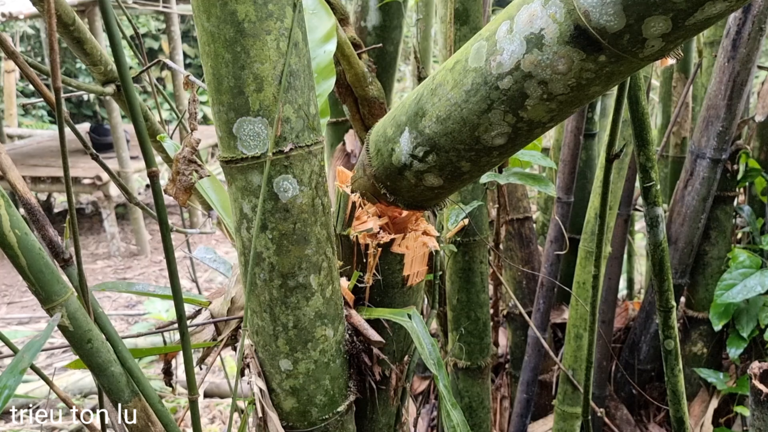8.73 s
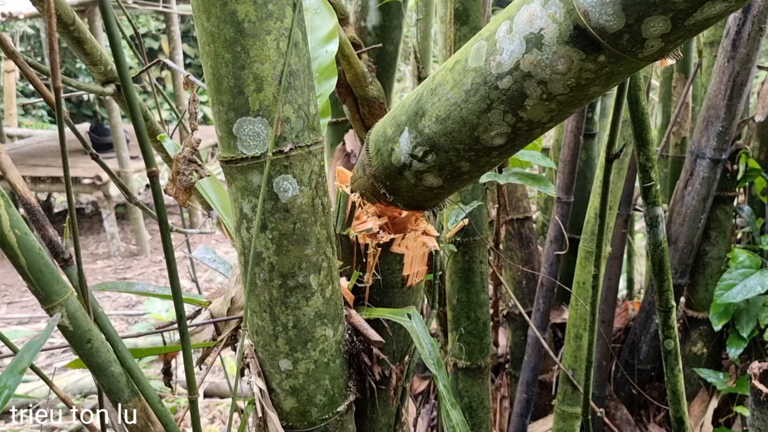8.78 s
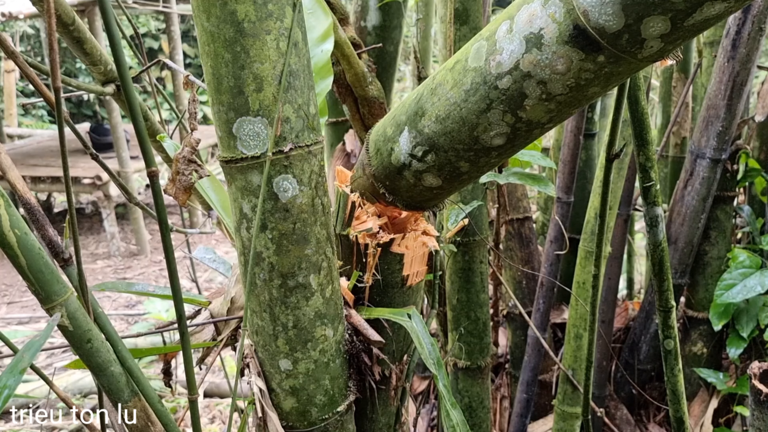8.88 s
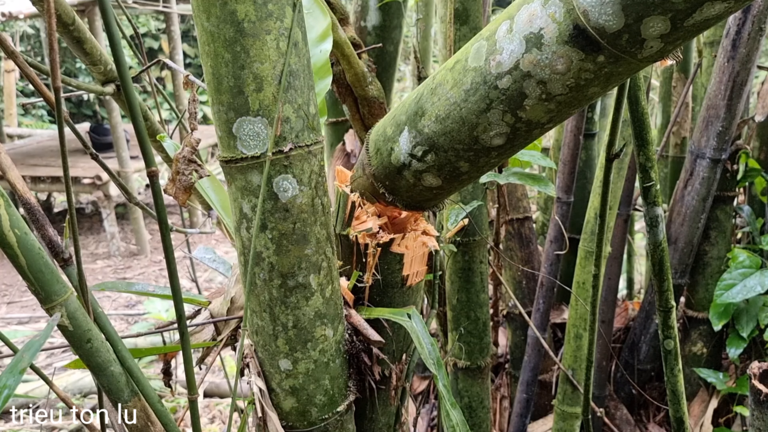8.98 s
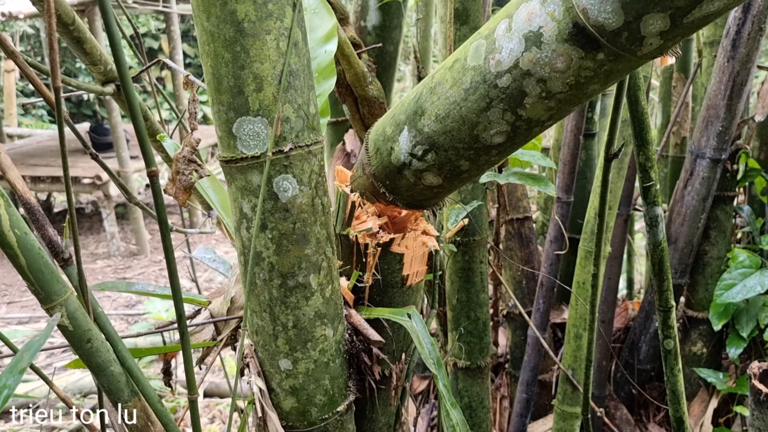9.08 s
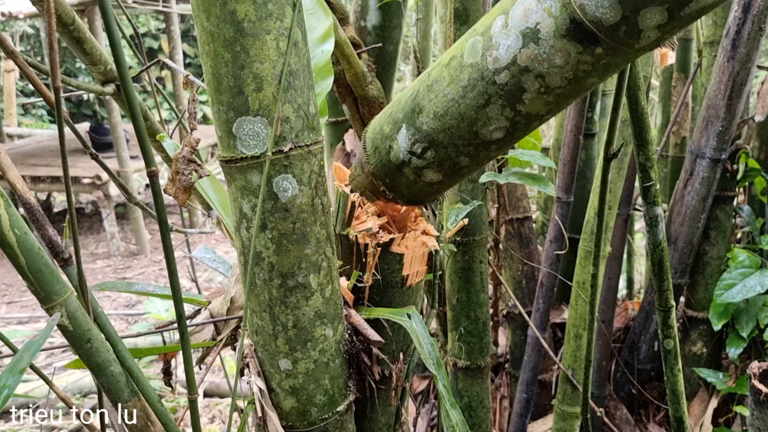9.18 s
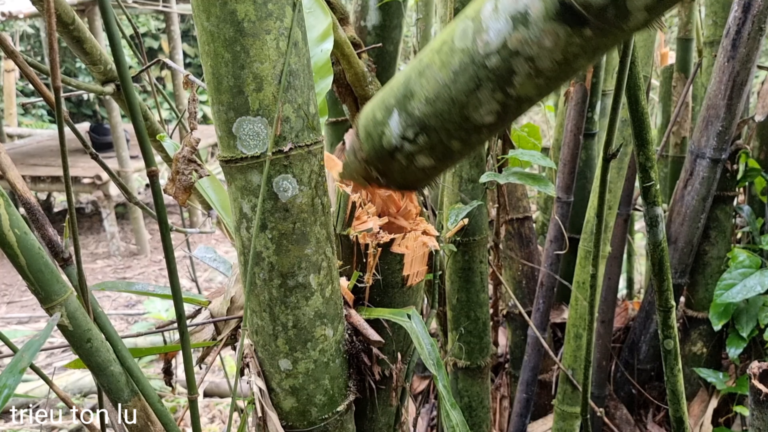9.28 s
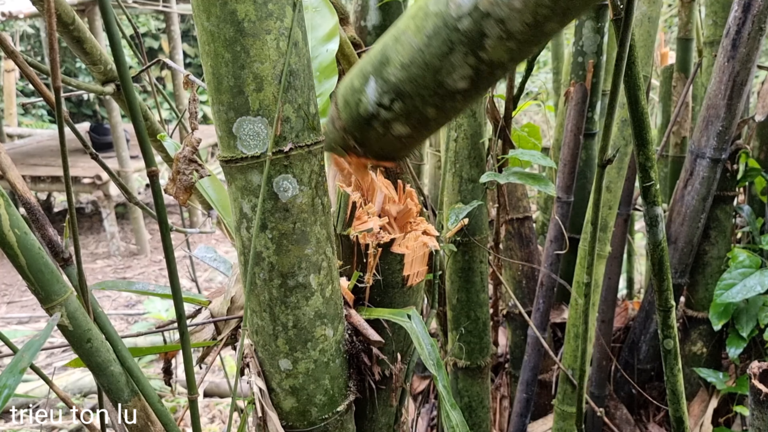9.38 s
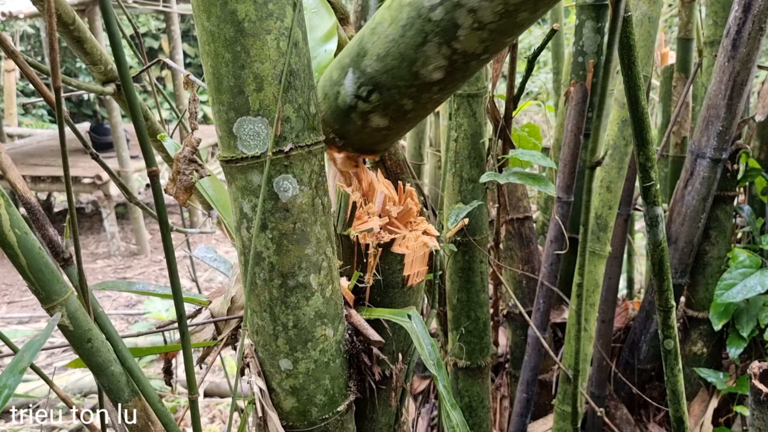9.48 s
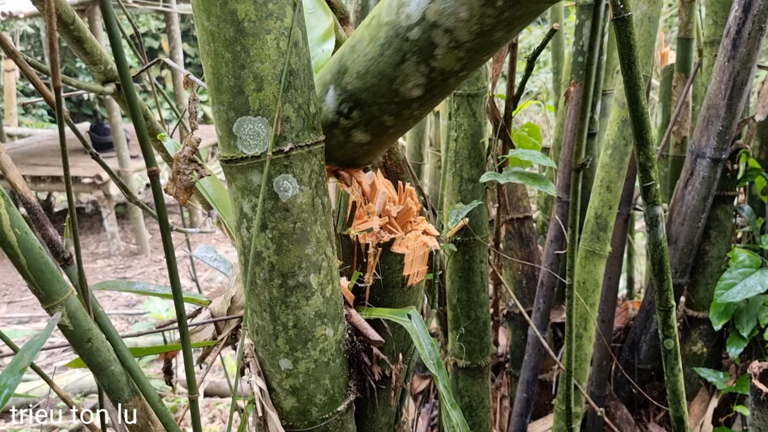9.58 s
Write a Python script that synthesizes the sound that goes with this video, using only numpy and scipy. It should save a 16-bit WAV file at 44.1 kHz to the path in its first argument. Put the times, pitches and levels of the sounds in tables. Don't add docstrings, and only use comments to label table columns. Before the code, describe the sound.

In a quiet bamboo grove, a blade bites a thick hollow stem in sharp, woody, resonant blows that thud in the soil and echo among the stems. Small chips and twigs tick down. A near bird gives a fast rising trill, then the hardest chops fall. Finally stems and dry leaves scrape, bump and snap as they are dragged away. Close stereo microphones, faint insects and distant whistles.

```python
import sys
import numpy as np
from scipy import signal
from scipy.fft import rfft, irfft, next_fast_len
from scipy.io import wavfile
from scipy.ndimage import uniform_filter1d, map_coordinates

SR = 44100
rng = np.random.default_rng(int(sys.argv[2]) if len(sys.argv) > 2 else 0)


def undo_db(level):
    steps = np.asarray(level, float) / 20
    return 10 ** steps


def master(y):
    cut = np.clip(np.atleast_2d(y).T, -1, 1)
    pcm = np.round(cut * 32767)
    wavfile.write(sys.argv[1], SR, pcm.astype(np.int16))


N = 424683

# (frequency [Hz], level [dB])
AIR_COLOUR = [(15, -24.5), (25, -2.5), (49, -10), (152, -18.5), (340, -7), (826, -5.5), (1270, -4),
              (1620, -8), (3530, -8.5), (7910, -17.5), (11500, -28), (14300, -24.5), (15500, -24)]
# (time [s], level [dB])
AIR_LEVEL = [(0, -75.5), (1.9, -73.5), (3.6, -73.5), (5.599, -73), (6.501, -76), (6.8, -65.5), (7.5, -68),
             (8.699, -73), (9.63, -73.5)]
# (frequency [Hz], left-right likeness [-1..1])
AIR_LIKENESS = [(60, .9), (240, .4), (950, -.2), (3770, .2), (15000, .1)]
# (time [s], length [s], pitch [Hz], level [dB])
CRICKETS = [(0.022, 0.18, 6040, -78), (0.9, 0.094, 6160, -70), (1.345, 0.042, 6300, -81),
            (3.723, 0.13, 6180, -69), (5.712, 0.25, 6220, -74.5), (5.799, 0.34, 6620, -75.5)]
# (time [s], length [s], start pitch [Hz], end pitch [Hz], level [dB])
FAR_WHISTLES = [(3.3, .33, 4080, 4150, -80), (5.5, .1, 2950, 3300, -71), (6.185, .33, 4470, 4440, -70),
                (6.52, .19, 4700, 4670, -72), (4.68, .1, 6750, 6720, -79), (6.198, .025, 5650, 5640, -73),
                (6.31, .2, 5680, 5650, -86), (.885, .06, 3200, 3350, -79), (1.33, .11, 2750, 2950, -77),
                (5.745, .06, 3100, 3400, -81)]
# (time [s], length [s], start pitch [Hz], end pitch [Hz], level [dB])
LEAD_IN = [
    (1.915, 0.04, 7500, 6100, -56.5),
    (2.11, 0.081, 7290, 7910, -54),
    (2.352, 0.0495, 8470, 8360, -55),
]
# (time [s], peak level [dB])
TRILL = [(2.49, -45.5), (2.6248, -44.5), (2.7538, -42.5), (2.882, -43.5), (3.0167, -44), (3.147, -45),
         (3.287, -46)]
# (frequency [Hz], T60 [s])
NEAR_ECHO = [(100, 0.5), (500, 0.2), (2500, 0.17), (12000, 0.018)]
# (frequency [Hz], T60 [s])
FAR_ECHO = [(100, 0.07), (600, 0.83), (2700, 0.65), (12000, 0.31)]
# (frequency [Hz], level [dB])
FAR_COLOUR = [(300, -3.5), (1200, -7), (4000, -3), (12000, 3)]
# (frequency [Hz], left-right likeness [-1..1])
ECHO_LIKENESS = [(100, 1), (220, 0.58), (380, 0.48), (700, 0.068), (5000, 0.043)]
# (frequency [Hz], left-right likeness [-1..1])
DIRECT_LIKENESS = [(100, 1), (400, 0.56), (1500, 0.46), (6000, 0.73), (14000, 0.018)]
# (time [s], level [dB])
HEAVY_BLOWS = [
    (.226, -34.5),
    (.952, -41.5),
    (4.222, -34.5),
    (4.909, -62.5),
]
# (frequency [Hz], level [dB])
CLUMP_COLOUR = [(250, -31), (480, -5), (640, 3), (850, -4.5), (1900, -18.5), (2650, -2), (3400, -19.5),
                (12000, -27)]
# (time [s], peak level [dB])
THUDS = [(0.229, -28.5), (0.948, -25), (1.491, -47), (1.645, -40.5), (1.7, -65), (2.869, -60), (2.925, -77),
         (4.2, -63.5), (4.22, -37.5), (4.333, -50), (4.917, -45), (6.614, -76), (8.211, -58.5),
         (8.52, -57.5)]
# (frequency [Hz], level [dB])
SOIL_COLOUR = [(18, -36), (30, -8), (80, 0.5), (108, -6), (200, -6.5), (260, -30.5), (440, -120)]
# (frequency [Hz], left-right likeness [-1..1])
GROUND_LIKENESS = [(30, .96), (80, .99), (250, .9)]
# (time [s], level [dB])
FOOTFALLS = [(6.63, -63), (6.901, -69), (7.08, -57), (7.33, -53.5), (7.49, -56.5), (7.68, -65.5),
             (8.19, -63), (8.511, -71), (9.35, -58.5), (9.47, -70)]
# (frequency [Hz], level [dB])
STEP_COLOUR = [(15, -37), (25, 6), (65, 3.5), (156, -14), (190, -9), (250, -27), (420, -120)]
# (time [s], scrape level [dB], tube over scrape [dB])
CREEP = [(6.501, -85, -10), (6.779, -78.5, -12), (6.88, -60.5, -9), (7.1, -63.5, 4), (7.195, -71, -2),
         (7.3, -58, 1), (7.39, -72, 2), (7.62, -60, 1.5), (7.85, -65.5, -5), (8.0, -75.5, 7),
         (8.091, -59, -4.5), (8.2, -70, 1.5), (8.4, -63.5, -9), (8.622, -71.5, -2), (8.8, -68, 1),
         (8.95, -70.5, -2.5), (9.15, -80, 3.5), (9.5, -64.5, -6)]
# (peak time [s], scrape level [dB], swell by 20 dB [s], tube over scrape [dB], leaves over scrape [dB])
TUGS = [(5.36, -59.5, -0.01, -0.5, -4.5), (6.629, -53, -0.15, -1, -9.5), (6.9, -50.5, 0.04, -19, -22),
        (6.97, -48, 0.02, -20, -11.5), (7.039, -40.5, 0, -29, -12), (7.13, -55, 0.02, -13, -24),
        (7.268, -35.5, -0.03, -4.5, -9), (7.306, -38.5, -0.0329, -2, -25), (7.02, -37.5, -0.0339, -22, -8),
        (7.28, -40, 0.0458, -12, -17), (7.229, -48, 0.03, -17, -11), (7.34, -55, 0.09, -13, -9),
        (7.461, -43.5, 0.0342, -7, -20), (7.514, -43, 0.0157, -11, -14), (9.42, -44.5, 0.0137, -8, -16),
        (9.45, -42, -0.0341, -8, -15), (9.324, -39, -0.0344, -15, -12), (7.489, -38, 0.0165, -3, -11),
        (7.09, -50.5, 0.0845, -9, -15), (7.16, -55.5, 0.19, -8.5, -13), (7.746, -43, 0.0137, 1.5, -13.5),
        (8.19, -67.5, 1.17, 1.5, -2), (8.45, -63, -1.4, -10.5, -7.5), (8.513, -43, -0.09, -19, 12),
        (9.25, -40, -0.0238, -3, -16.5), (9.288, -38.5, -0.1534, -6, -10), (9.35, -32, -0.0143, -13, -4),
        (9.388, -44.5, 0.0958, 1.5, -10), (9.468, -68, 0.15, -1, -26), (9.625, -41, -0.1947, -9.5, -15)]
# (frequency [Hz], level [dB])
SCRAPE_COLOUR = [(290, -32), (500, -16), (681, -11), (786, 0), (1310, -5), (1430, -6), (1920, -1),
                 (7000, -16), (9100, -48), (15400, -120)]
# (frequency [Hz], width [Hz], level [dB])
GROANS = [(1230, 240, -1), (1870, 660, -8.5), (2750, 800, -2), (3700, 1100, -6)]
# (frequency [Hz], level [dB])
LEAF_COLOUR = [(2350, -27.5), (4000, -7), (6290, 0), (11800, -4), (14300, 2.5), (15400, -4), (16000, -13)]
# (time [s], peak level [dB], wall ring [Hz], tube level [dB])
BUMPS = [(6.969, -37, 1280, -7), (7.045, -21, 1210, -9.5), (7.317, -21.5, 1120, -9.5),
         (7.453, -32.5, 1600, -10), (7.471, -27.5, 1780, -11), (7.553, -50, 1920, 10.5),
         (7.617, -44.5, 1090, -8), (7.704, -40, 1130, -5), (7.967, -43.5, 1150, -7.5),
         (8.284, -58, 790, 15.5), (9.287, -34.5, 1810, -5), (9.334, -24, 2330, -7),
         (9.462, -27.5, 1060, -4), (9.525, -39.5, 1100, -2), (9.545, -42, 2660, -20), (9.587, -44, 813, 2),
         (9.599, -38, 929, -17)]
# (time [s], peak level [dB], wall ring [Hz], crack level [dB])
SNAPS = [(6.794, -49, 2750, -0.5), (6.895, -33, 1240, -33), (6.994, -34, 2680, -25), (7.015, -39, 3700, -7),
         (7.125, -31, 1130, -36), (7.22, -32, 2220, -24), (7.257, -27, 1310, -11), (7.293, -26, 1560, -41),
         (7.432, -41.5, 1890, -30), (7.735, -30.5, 2440, -11.5), (7.787, -36.5, 2520, -20),
         (7.892, -63.5, 867, 25.5), (7.934, -50.5, 1210, -3), (8.313, -39, 2400, -19),
         (8.464, -37, 1800, -10), (8.512, -22.5, 1980, -5.5), (8.56, -33.5, 3460, -2.5),
         (8.602, -45.5, 3145, 1), (8.92, -57.5, 1177, 12.5), (9.029, -48, 1522, -8.5),
         (9.241, -34.5, 841, -12), (9.318, -37, 1750, -16), (9.365, -28, 1680, 1),
         (7.064, -32.5, 2470, -27), (7.236, -36, 2200, -9), (7.273, -26.5, 1500, -17),
         (7.358, -47.5, 3000, 1.5), (7.486, -26.5, 2060, -10), (7.494, -24.5, 1770, -14),
         (7.634, -40, 2700, -6), (7.759, -38.5, 3000, -7), (7.8, -48, 5500, 5.5), (8.249, -58, 5000, 0),
         (8.332, -41.5, 2830, -12), (9.054, -59, 1080, 8), (9.203, -48.5, 3080, -16),
         (9.253, -35.5, 3390, -11), (9.351, -33, 1500, 2), (9.612, -38.5, 2570, -1)]
# (frequency [Hz], width [Hz], level [dB])
WALL_BODY = [(740, 140, 2), (1900, 1600, -1), (4430, 3300, -6.5)]
# (frequency [Hz], width [Hz], level [dB])
WALL_RINGS = [(970, 330, 1.5), (1500, 280, 0.5), (1850, 87, 1.5), (2430, 230, -1), (3270, 290, -7)]
# (frequency [Hz], width [Hz], level [dB])
TUBE = [(311, 100, -3), (474, 110, 3), (548, 290, -0.5)]
# (time [s], peak level [dB], wall ring [Hz], crack level [dB])
CHIPS = [(0.71, -52, 2955, -0.5), (0.768, -53, 2650, -35.5), (1.711, -37, 3700, -20), (1.753, -47, 1870, 1),
         (2.869, -33.5, 831, -23.5), (2.924, -34, 1001, -7), (2.961, -43, 3230, -16.5),
         (5.269, -53, 920, -11), (5.31, -45.5, 2524, -15.5), (5.412, -45.5, 3010, -30),
         (1.724, -38, 4800, -20), (3.785, -49.5, 3400, -19), (4.637, -46.5, 2990, -6.5),
         (4.669, -47.5, 4020, -17), (4.736, -51.5, 4500, -9), (6.198, -54, 1230, -17.5)]
# (time [s], peak level [dB], wall ring [Hz], crack level
# [dB])
TWIGS = [(1.516, -17.5, 4100, -35), (1.85, -39.5, 1940, 4.5), (1.983, -38, 2390, -8),
         (2.079, -60, 3050, 7.5), (2.25, -36.5, 3260, 11.5), (2.406, -35.5, 2300, -21),
         (2.449, -45.5, 3530, -27), (2.486, -35.5, 2870, -38.5), (2.635, -32.5, 3270, -36),
         (2.726, -50.5, 3260, -6), (2.788, -48.5, 2880, 2), (3.318, -51, 1400, -11),
         (3.499, -51, 3290, -11.5), (3.634, -50, 1230, -22), (3.748, -48.5, 3530, -8),
         (4.766, -38.5, 927, -27.5)]
# (time [s], peak level [dB], pitch [Hz], T60 [s])
HOLLOW_TONES = [(0.229, -26.5, 431, 0.23), (0.232, -27, 244, 0.25), (0.953, -18, 436.5, 0.096),
                (0.954, -21, 309, 0.093), (1.493, -29, 514, 0.083), (1.648, -37, 130.6, 0.13),
                (1.515, -33.5, 327, 0.086), (1.642, -36.5, 535, 0.14), (3.867, -42, 482, 0.12),
                (4.01, -37.5, 449, 0.087), (4.945, -26.5, 519, 0.1), (5.345, -56, 349, .2),
                (2.93, -56, 250.3, 0.22), (4.221, -29, 318, 0.075), (4.34, -21, 307.7, 0.098),
                (4.908, -32, 320, 0.1), (5.845, -43.5, 326, 0.16), (7.047, -37.5, 362, 0.13),
                (7.316, -41.5, 399, 0.087), (7.553, -33.5, 372, 0.061), (9.289, -30, 340, 0.045),
                (9.366, -32, 362, 0.067), (9.462, -35, 398, 0.085), (.229, -27, 548, 0.088),
                (.954, -22, 515, .09)]
# (time [s], peak level [dB], pitch [Hz], T60 [s])
WOODY_TONES = [(0.228, -13, 1064, 0.068), (.2275, -8, 1537, 0.035), (.228, -13.5, 955, 0.077),
               (.228, -16, 2610, 0.069), (.228, -16, 2075, .09), (0.953, -18, 1790, 0.056),
               (.952, -17, 2190, 0.043), (.953, -19, 1064, 0.095), (.953, -23, 935, 0.14),
               (.952, -19.5, 1420, 0.067), (1.644, -21, 780, 0.05), (4.224, -9, 1403, 0.073),
               (4.232, -15.5, 2440, 0.068), (4.222, -17.5, 3180, .12), (4.342, -12, 2870, 0.024),
               (4.922, -17, 2890, 0.048), (4.922, -16, 3350, 0.043), (2.405, -40.5, 1978, 0.036),
               (1.484, -25, 1297, 0.05), (1.643, -24, 1070, 0.072), (2.485, -35, 2870, 0.03),
               (2.636, -52, 3270, 0.03), (3.868, -32.5, 2430, 0.03), (4.0085, -12.5, 2720, 0.025),
               (4.0085, -16, 3180, .026), (4.009, -27.5, 1140, 0.048), (3.867, -30, 3600, 0.052),
               (3.867, -31.5, 970, 0.057), (4.199, -20, 1880, 0.031), (4.221, -7, 966, 0.056),
               (4.234, -10, 1780, 0.032), (4.342, -7.5, 1167, 0.034), (4.91, -15, 986, 0.057),
               (4.922, -12.5, 1656, 0.057), (5.845, -27.5, 1340, 0.049), (7.046, -29, 1276, 0.035),
               (7.125, -28.5, 1120, 0.036)]
# (time [s], peak level [dB], wall ring [Hz], tube level [dB], contact [s])
KNOCKS = [(1.481, -21.5, 1830, -15.5, 0.095), (1.516, -18, 2540, -19, 0.036),
          (1.626, -34.5, 923, -9, 0.056), (3.867, -24, 2430, -23, 0.022), (4.008, -21, 2900, -24, 0.016),
          (4.199, -16, 1770, -30.5, 0.05), (4.234, -7.5, 1805, -19, 0.037),
          (4.922, -10, 1614, -18.5, 0.029), (5.845, -24.5, 1360, -16.5, 0.029)]
# (time [s], peak level [dB], wall ring [Hz], tube level [dB], contact [s])
CUTS = [
    (0.2278, -7.5, 1300, -14.5, 0.039),
    (0.9522, -12, 2150, -5.5, 0.043),
    (1.613, -44, 2870, -28, 0.038),
    (1.643, -23.5, 1065, -10.5, 0.085),
    (4.001, -31, 2820, -22, 0.074),
    (4.221, -7, 1150, -25, 0.067),
    (4.341, -3, 1260, -18, 0.024),
    (4.894, -28, 1830, -19, 0.051),
    (4.909, -13, 969, -19, 0.057),
]


def unit(x):
    return x / np.sqrt(np.mean(x ** 2) + 1e-20)


def along(points, hz):
    f, v = np.transpose(points)
    return np.interp(np.log(hz + 1), np.log(f + 1), v)


def wobble(rate):
    return map_coordinates(rng.standard_normal(int(N * rate / SR) + 4), [np.arange(N) * rate / SR])


def filtered(x, response):
    n = x.shape[-1]
    m = next_fast_len(n + 8192)
    return irfft(rfft(x, m) * response(np.fft.rfftfreq(m, 1 / SR)), m)[..., :n]


def modes(table):
    def response(f):
        total = 0
        for k, (centre, width, db) in enumerate(table):
            damping = 1j * f * width
            total = total + (-1) ** k * undo_db(db) * damping / (centre * centre - f * f + damping)
        return total
    return response


def pair(ab, colour, alike):
    def response(hz):
        turn = np.arccos(np.clip(along(alike, hz), -1, 1)) / 2
        return undo_db(along(colour, hz)) * [np.cos(turn), np.sin(turn)]
    both = filtered(ab, response)
    mid, side = both[..., 0, :], both[..., 1, :]
    return np.stack([mid + side, mid - side], axis=-2)


def grit(rate, spread_db):
    happens, size = rng.random((2, N))
    return (happens < rate / SR) * undo_db(-spread_db * np.log(size + 0.003)) * rng.choice([-1, 1], N)


def tails(t60, colour, count):
    noise = rng.standard_normal((count, 2, SR * 3 // 4))
    hz, t, z = signal.stft(noise, SR, nperseg=256)
    lumps = uniform_filter1d(rng.standard_normal(z[:, :1].shape), 3, -2)
    lumps = unit(uniform_filter1d(lumps, 9, -1))
    decay_db = 1.5 * lumps - 60 * t / along(t60, hz)[:, None]
    tail = pair(signal.istft(z * undo_db(decay_db), SR, nperseg=256)[1], colour, ECHO_LIKENESS)
    return tail / np.linalg.norm(tail[0, 0])


def grove(x, kick, near_db, far_db, pan_db):
    near = undo_db(near_db) * tails(NEAR_ECHO, [(1000, 0)], count=5)
    far = undo_db(far_db) * tails(FAR_ECHO, FAR_COLOUR, count=5)
    slot = np.arange(N) * 4 // SR % 5
    wet = 0
    for k, echo in enumerate(near + far):
        late = np.pad(kick * (slot == k), (110, 0))
        wet = wet + signal.fftconvolve(late[None], echo, axes=1)[:, :N]
    return (x + wet) * undo_db([[pan_db / 2], [-pan_db / 2]])


def air():
    z = signal.stft(rng.standard_normal((2, N)), nperseg=512)[2]
    patches = uniform_filter1d(rng.standard_normal(z.shape[1:]), 6, 0)
    patches = unit(uniform_filter1d(patches, 14, 1))
    noise = signal.istft(z * undo_db(1.8 * patches), nperseg=512)[1][:, :N]
    wash = pair(noise, AIR_COLOUR, AIR_LIKENESS)
    s, db = np.transpose(AIR_LEVEL)
    return undo_db(np.interp(np.arange(N) / SR, s, db) + 6.0) * unit(wash)


def crickets():
    out = np.zeros((2, N))
    for s, length, hz, db in CRICKETS:
        start, n = round(s * SR), round(length * SR)
        ring = modes([(hz, 170, 0)])
        hiss = unit(filtered(rng.standard_normal((2, n)), lambda f: ring(f) ** 2))
        pulsing = 1 + .5 * np.sin(2 * np.pi * 30 * np.arange(n) / SR)
        out[:, start:start + n] += undo_db(db) * hiss * np.hanning(n) ** 0.099 * pulsing
    return out


def note(length, start_hz, end_hz, glide):
    t = np.arange(round(length * SR)) / SR
    hz = end_hz + (start_hz - end_hz) * np.exp(-t / glide)
    swell = np.sin(np.pi * t / length) ** .5
    return swell * np.sin(2 * np.pi * np.cumsum(hz) / SR)


def birds():
    trill, held, scattered = np.zeros((3, N + SR))
    for s, db in TRILL:
        slur = note(0.029, start_hz=4900, end_hz=8220, glide=0.0077)
        rise = np.linspace(0, 1, len(slur)) ** 0.8
        trill[round((s - .012) * SR):][:len(slur)] += undo_db(db - 1.0) * slur * rise
    notes = [(*row, .012, 0) for row in LEAD_IN]
    notes += [(*row, .55 * row[1], 4.5) for row in FAR_WHISTLES]
    for s, length, start_hz, end_hz, db, glide, waver_db in notes:
        tone = note(length, start_hz, end_hz, glide)
        start, n = round(s * SR), len(tone)
        flutter = .6 * wobble(22)[:n] - .9 * np.sin(2 * np.pi * 30 * np.arange(n) / SR)
        fading_db = db + np.linspace(5, -5, n)
        held[start:][:n] += undo_db(fading_db + waver_db * flutter) * tone
        scattered[start:][:n] += undo_db(db - 4 * waver_db) * tone
    return (trill + held)[:N], (trill + scattered)[:N]


def clump():
    out = np.zeros((2, N + SR))
    for (s, db), tail in zip(HEAVY_BLOWS, tails(FAR_ECHO, CLUMP_COLOUR, count=len(HEAVY_BLOWS))):
        t = np.arange(tail.shape[1]) / SR
        answer = undo_db(db + 23.0) * tail * (1 - np.exp(-t / 0.029))
        out[:, round((s + .13) * SR):][:, :len(t)] += answer
    return out[:, :N]


def thuds():
    t, level = np.arange(SR // 2) / SR, np.zeros(N + SR)
    for s, db in THUDS:
        level[round(s * SR):][:len(t)] += undo_db(db + 1.5 - 60 * t / .25) * (1 - np.exp(-t / 0.013))
    return level[:N] * unit(pair(rng.standard_normal((2, N)), SOIL_COLOUR, GROUND_LIKENESS))


def swells(s, db, swell_s, release_share):
    t = np.arange(N) / SR - s
    away = np.maximum(-t, t / release_share) / max(swell_s, .005)
    return undo_db(db - 20 * np.minimum(away, 9) ** 1.64)


def effort():
    s, db, tube_db = np.transpose(CREEP)
    t = np.arange(N) / SR
    gains = undo_db([np.interp(t, s, level) for level in (db, db + tube_db, db - 4)])
    for s, db, swell_s, tube_db, leaves_db in TUGS:
        tug = swells(s, db, swell_s, release_share=1)
        gains = np.maximum(gains, tug * undo_db([[0], [tube_db], [leaves_db]]))
    tread = sum(swells(s, db, swell_s=0.082, release_share=1.74) for s, db in FOOTFALLS)
    return *gains, tread


def scraping(bunching):
    slips = undo_db(1.8 * bunching) * grit(4500, spread_db=2.5)
    scrape = unit(filtered(slips, lambda hz: undo_db(along(SCRAPE_COLOUR, hz))))
    groan = 0
    for row in GROANS:
        ring = modes([row])
        voice = filtered(slips, lambda f: ring(f) ** 2) * undo_db(-row[2])
        groan = groan + undo_db(5 * wobble(12)) * voice
    return unit(scrape + undo_db(-5) * unit(groan))


def tube_rumble():
    swell_db = 2.5 * (wobble(30) + .4 * wobble(7))
    slips = undo_db(swell_db) * grit(900, spread_db=4.0)
    return unit(filtered(slips, lambda f: modes(TUBE)(f) * modes([(380, 400, 0)])(f)))


def leaf_crackle(bunching):
    swell_db = 2.2 * bunching + 2.5 * (wobble(60) + 0.62 * wobble(20))
    clicks = undo_db(swell_db) * grit(5200, spread_db=0.0)
    return unit(filtered(clicks, lambda hz: undo_db(along(LEAF_COLOUR, hz))))


def drag():
    rub, hollow, leafy, tread = effort()
    bunching = wobble(70)
    rustle = undo_db(-4.5) * rub * scraping(bunching)
    rustle = rustle + undo_db(-4.0) * hollow * tube_rumble()
    rustle = rustle + undo_db(-3.0) * leafy * leaf_crackle(bunching)
    soil = unit(pair(rng.standard_normal((2, N)), STEP_COLOUR, GROUND_LIKENESS))
    return rustle, undo_db(2.5) * tread * soil


def knocks(table, ring_db, tube_db, crack_db, spike, thin):
    out, lead = np.zeros((3, N + SR)), SR // 50
    t = (np.arange(SR // 6) - lead) / SR
    for s, db, hz, tube, crack, contact in table:
        bright_hz = np.clip(9000 + 180 * crack, 3500, 14000)
        shifts = 1 + .06 * rng.standard_normal(len(WALL_RINGS))
        rings = modes([(c * k, w, g) for (c, w, g), k in zip(WALL_RINGS, shifts)])
        own_ring = modes([(hz, .25 * hz, ring_db)])
        fizz = modes([(bright_hz, 1.2 * bright_hz, 0)])
        small = lambda f: (1j * f / (1j * f + thin * hz)) ** 3
        wall = lambda f: small(f) * np.hypot(abs(modes(WALL_BODY)(f)), abs(own_ring(f)))
        wood = lambda f: small(f) * rings(f)
        air_column = lambda f: modes(TUBE)(f) * modes([(400, 500, 0)])(f)
        crackle = lambda f: small(f) * abs(fizz(f)) ** 2
        layers = [(-3, wall, 1, .85), (-6, wood, 1.1, .25),
                  (tube + tube_db, air_column, 1.7, .6), (crack + crack_db, crackle, .7, .65)]
        for level_db, colour, pace, spread in layers:
            upswell = undo_db(-33.0 + 1000 * t)
            decay = undo_db(-60 * t / (contact * pace)) * (1 - 0.55 * np.exp(-abs(t) / 0.024))
            force = pair(rng.standard_normal((2, len(t))), [(1000, 0)], DIRECT_LIKENESS)
            force *= np.where(t < 0, upswell, decay)
            force[:, lead + 30] += spike
            sound, pulse = filtered(force, colour), filtered(1. * (t == 0), colour)
            sound /= np.abs(sound.mean(0)).max()
            pulse *= spread * np.linalg.norm(sound[0]) / np.linalg.norm(pulse)
            out[:, round(s * SR) - lead:][:, :len(t)] += undo_db(db + level_db) * np.vstack([sound, pulse])
    return out[:, :N]


def snapping():
    bumps = [(s, db, hz, tube, -40, .022) for s, db, hz, tube in BUMPS]
    snaps = [(s, db, hz, -17.5, crack, 0.021) for s, db, hz, crack in SNAPS]
    return undo_db(-4.0) * knocks(bumps + snaps, ring_db=18.0, tube_db=-3, crack_db=3.0, spike=1.0, thin=0.33)


def tones(table, level_db, swell, turn):
    out, t, flicker = np.zeros((3, N + SR)), np.arange(SR // 4) / SR, wobble(120)
    for s, db, hz, t60 in table:
        side, place = rng.random(2)
        lag = turn * min(hz / 800, 1) * (2 * side - 1) * np.array([[1], [-1], [0]])
        life = min(t60, .2, 115 / hz)
        lives = np.array([[life], [life], [.012]])
        uneven_db = 2.5 * flicker[int(place * (N - len(t))):][:len(t)]
        gain = undo_db(db + level_db + uneven_db - 60 * t / lives) * (1 - np.exp(-t / swell))
        out[:, round(s * SR):][:, :len(t)] += gain * np.sin(2 * np.pi * hz * t + lag)
    return out[:, :N]


def chopping():
    blows = [(s, db, hz, tube, -15.5, contact) for s, db, hz, tube, contact in CUTS]
    blows += [(s, db, hz, tube, -24, contact) for s, db, hz, tube, contact in KNOCKS]
    bits = [(s, db, hz, -12.5, crack, 0.019) for s, db, hz, crack in CHIPS]
    bits += [(s, db, hz, -29.5, crack, 0.014) for s, db, hz, crack in TWIGS]
    heavy = knocks(blows, ring_db=0.0, tube_db=-1.0, crack_db=5.5, spike=2.1, thin=0.27)
    light = knocks(bits, ring_db=11, tube_db=-4.5, crack_db=-3.5, spike=2.5, thin=0.79)
    return heavy + light


def scene():
    song, song_feed = birds()
    far = grove(song, song_feed, near_db=-3, far_db=2.0, pan_db=-2.5)
    rustle, soil = drag()
    snaps = snapping()
    dragged = grove(snaps[:2] + rustle, snaps[2] + rustle, near_db=-6, far_db=-20.0, pan_db=-2.4)
    chop = chopping()
    hollow = tones(HOLLOW_TONES, level_db=1.0, swell=0.0072, turn=0.88)
    woody = tones(WOODY_TONES, level_db=-3.5, swell=0.0023, turn=0.99)
    direct = chop[:2] + hollow[:2] + woody[:2]
    feed = chop[2] + undo_db(-12) * hollow[2] + undo_db(-4.5) * woody[2]
    near = grove(direct, feed, near_db=-1.0, far_db=-1.5, pan_db=0.0) + clump()
    return air() + crickets() + far + thuds() + soil + dragged + near


def low_pass(x):
    return signal.sosfilt(signal.butter(12, 16620, fs=SR, output="sos"), x)


def record(dry):
    def microphone(hz):
        return (1j * hz / (1j * hz + 55)) ** 2 / (1 + (hz / 15400) ** 60)
    heard = filtered(dry, microphone)
    heard = heard / (1 + abs(heard / .7) ** 3) ** (1 / 3)
    return low_pass(heard)


dry = scene()
out = record(dry)
master(out)
```